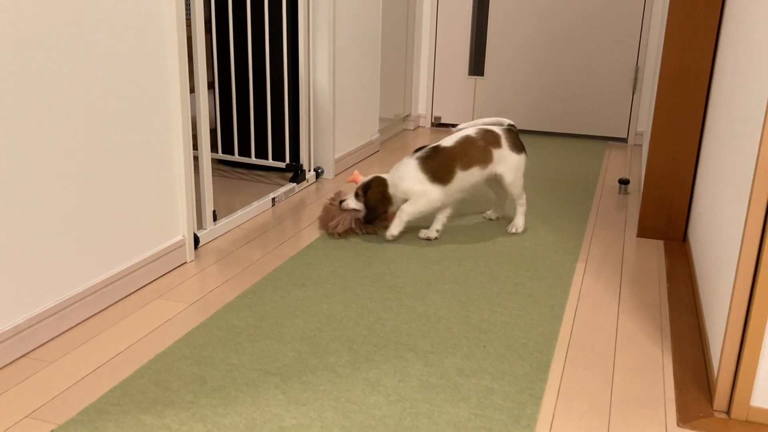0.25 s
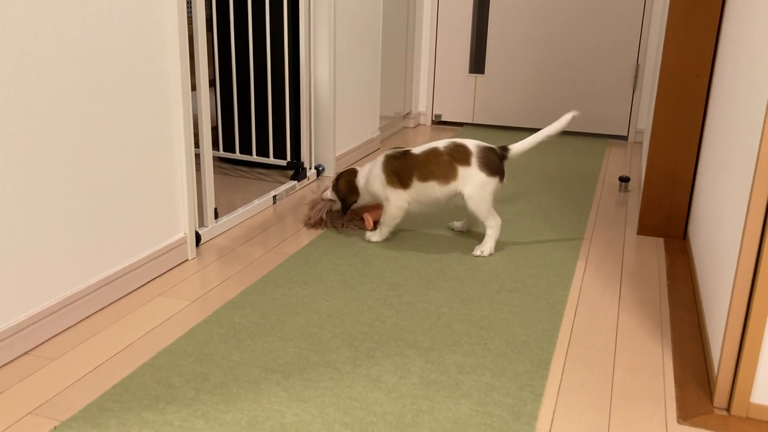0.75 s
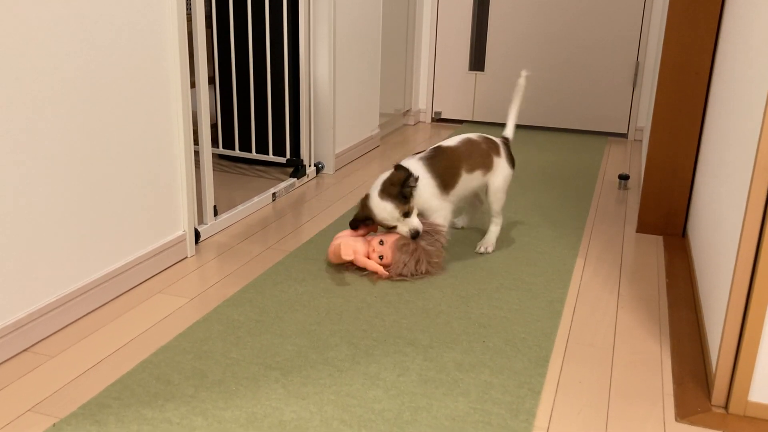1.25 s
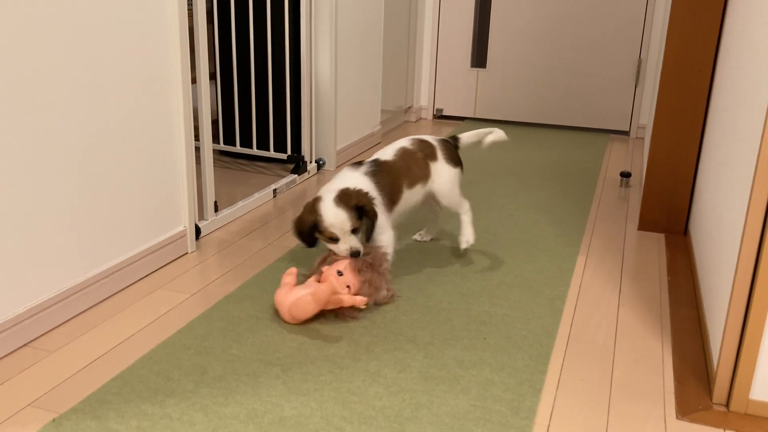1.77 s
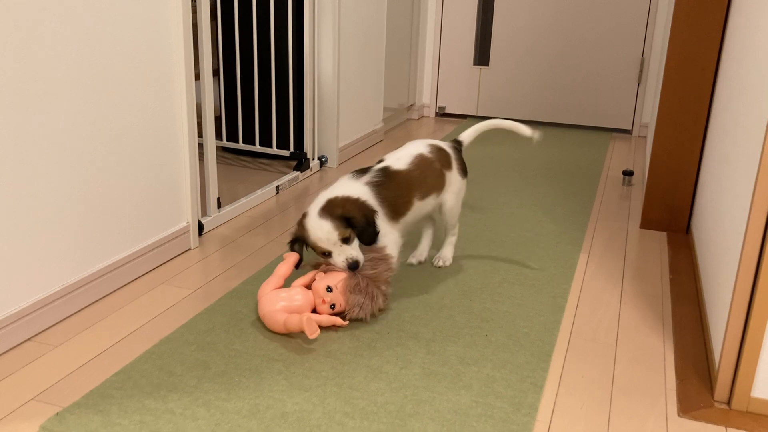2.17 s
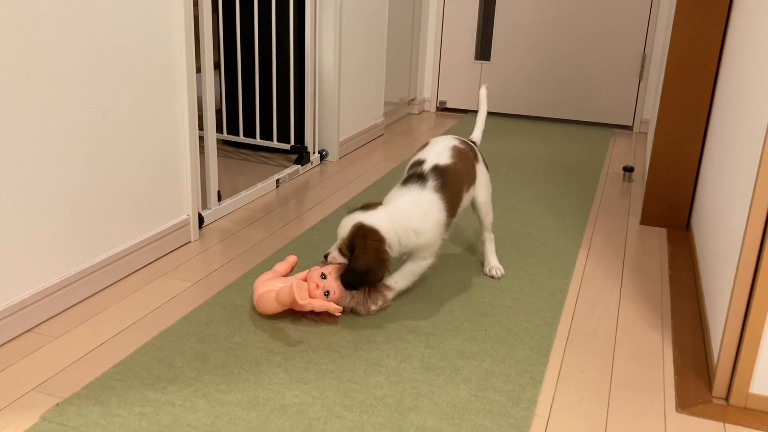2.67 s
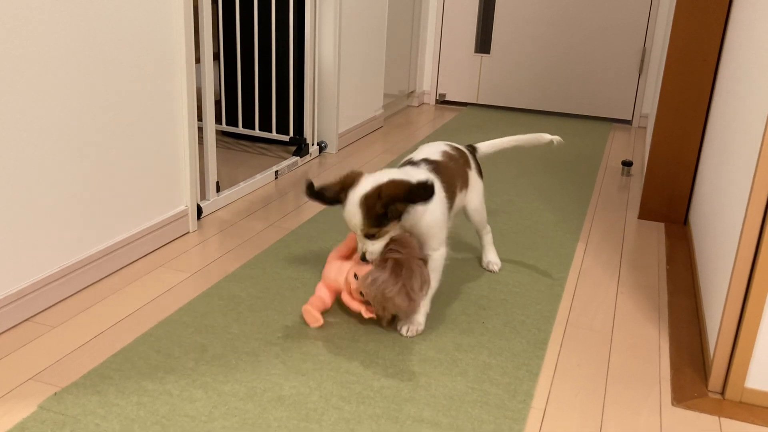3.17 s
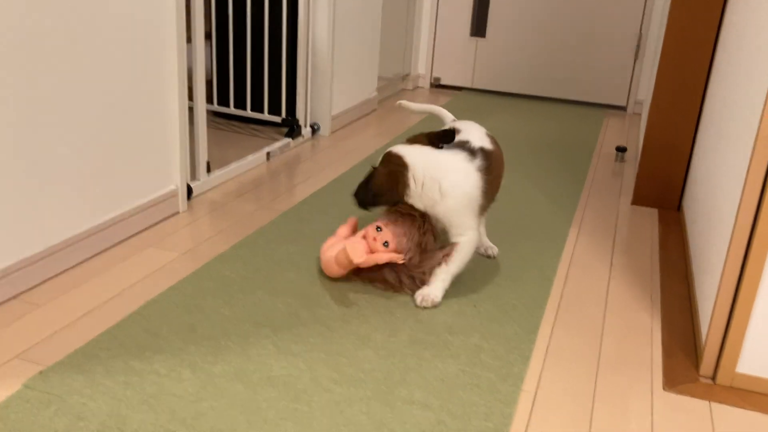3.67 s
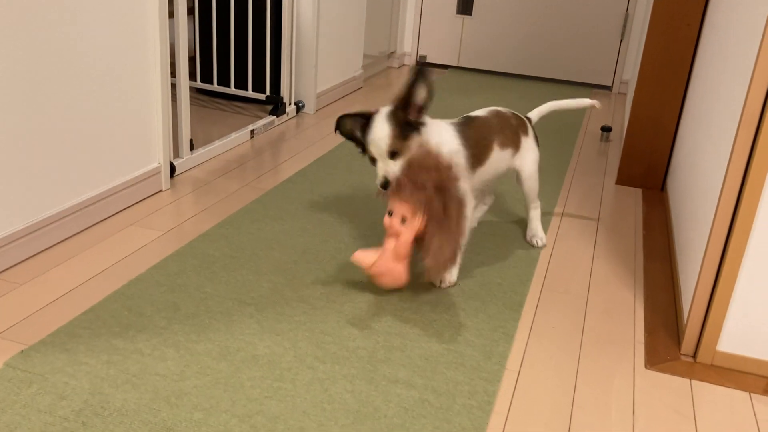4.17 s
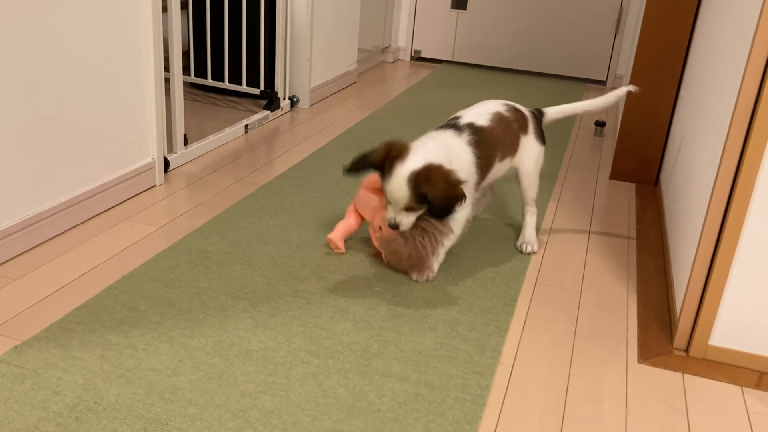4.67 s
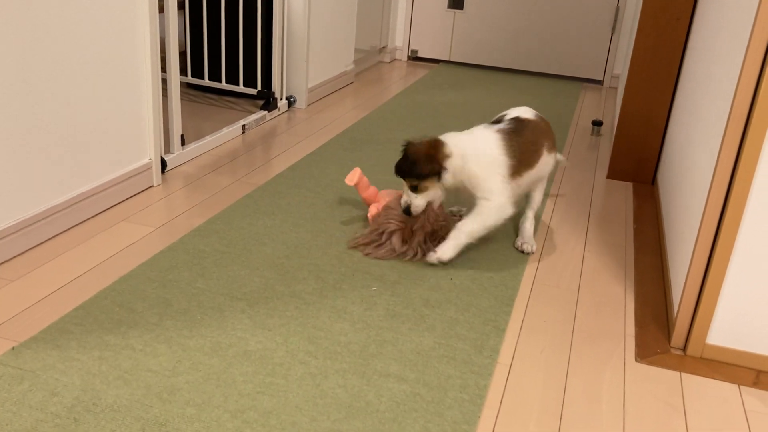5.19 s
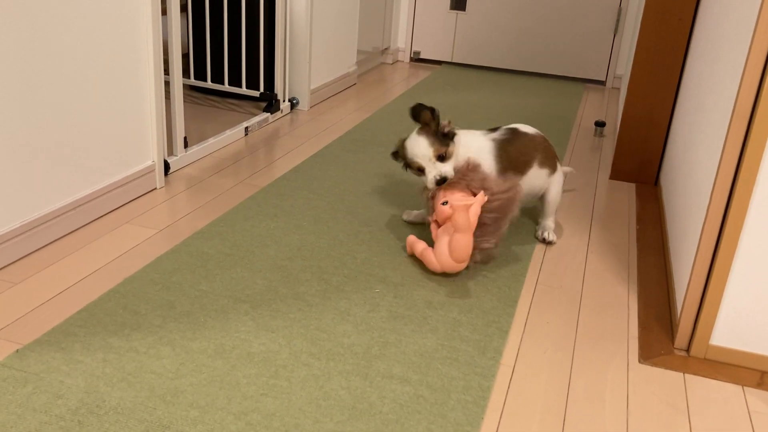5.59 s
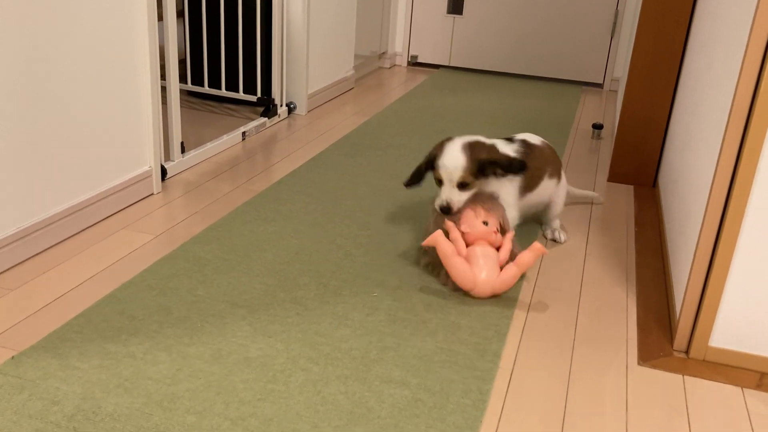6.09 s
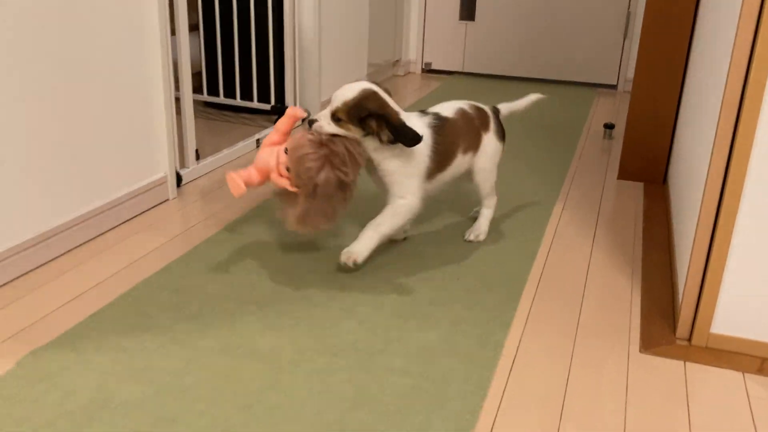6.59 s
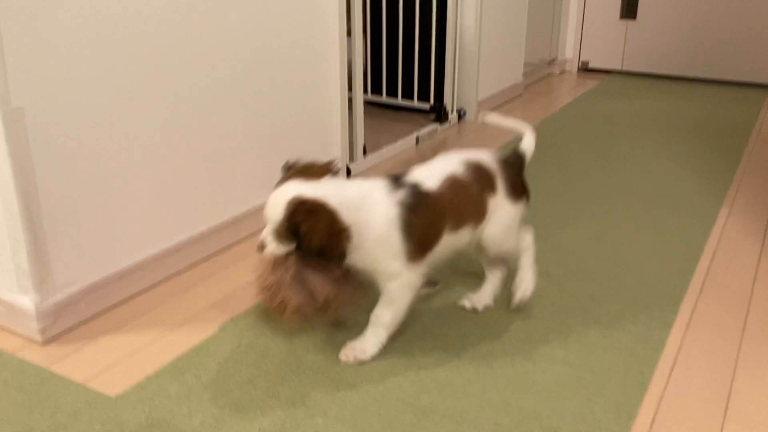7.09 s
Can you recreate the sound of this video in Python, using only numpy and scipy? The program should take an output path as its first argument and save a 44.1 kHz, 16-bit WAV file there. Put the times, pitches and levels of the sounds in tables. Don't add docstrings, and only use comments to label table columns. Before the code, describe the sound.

In a narrow indoor hallway, a small puppy growls in about ten short, rough bursts, muffled round a plastic doll and jerking in pitch as it tugs. Between and across the growls the doll and paws hit the boards with low, dull thumps, some hard, with small plastic and claw ticks. Carpet and fur rustle softly. A small stereo recorder picks it up slightly left, with faint hiss and short room reflections.

```python
import sys
import numpy as np
from scipy import signal
from scipy.fft import rfft, irfft
from scipy.io import wavfile
from scipy.ndimage import uniform_filter1d

SR = 44100
rng = np.random.default_rng(int(sys.argv[2]) if len(sys.argv) > 2 else 0)


def materialize(psi):
    bounded = np.clip(np.atleast_2d(psi).T, -1, 1)
    quanta = np.round(bounded * 32767).astype(np.int16)
    wavfile.write(sys.argv[1], SR, quanta)


def rack_gain(trim_db):
    fader = np.asarray(trim_db, float)
    return 10 ** (fader / 20)


N = 323840

# (start [s], length [s], effort [dB], pitch [Hz], open mouth over throat [dB])
GROWLS = [
    (0.129, 0.42, -52, 129.1, -3),
    (0.885, 0.56, -45.5, 182.5, -15),
    (1.866, 0.41, -49, 142.3, -12.5),
    (2.87, 0.56, -45.5, 167.1, -24.5),
    (3.799, 0.55, -46, 172.2, -18),
    (4.795, 0.15, -55, 185.5, -12),
    (5.057, 0.28, -54, 184.6, -12),
    (5.599, 0.27, -49, 175.4, -15),
    (6.118, 0.13, -43, 154.9, -17),
    (7.031, 0.322, -51.5, 167, -12.5),
]
# (time [s], half length [s], effort change [dB], pitch change [semitones], mouth change [dB])
TUGS = [(0.345, 0.06, 4.5, 1.61, -5), (0.459, 0.06, 11, 4, -7.5), (0.958, 0.049, 3.5, 0, 4.5),
        (1.082, 0.051, 4, 2.04, 9), (1.189, 0.015, -4, 0.4, 3), (1.936, 0.081, 5.5, 1.94, 3),
        (2.281, 0.063, 3, 4.5, -29), (2.91, 0.047, -1, 0.5, 18), (2.988, 0.058, 6, 3, 14),
        (3.116, 0.026, -3.5, -1.1, 5), (3.369, 0.058, 5.5, -0.09, 15), (3.925, 0.046, 5, -1.5, 3),
        (4.04, 0.04, 5.5, 1, 8), (4.177, 0.052, 8, 1.11, 7.5), (4.254, 0.028, 3, -3, 1.5),
        (4.361, 0.054, 11, 0.77, 5.5), (5.081, 0.034, 5.5, -5, -22), (5.208, 0.036, 11.5, 0.5, 2.5),
        (5.276, 0.031, 11.5, 1.06, 5.5), (5.623, 0.053, -2.5, -2.5, 0), (5.792, 0.043, 5, -0.93, 4),
        (7.066, 0.025, 8, -0.02, 7), (7.185, 0.026, 7, 0.4, 0), (7.287, 0.053, -10, 2.25, -16)]
# (centre [Hz], width [Hz], level [dB])
THROAT = [(264, 91.4, 5), (522, 119.6, 3), (617, 104, -2)]
# (centre [Hz], width [Hz], level [dB])
MOUTH = [(980, 350, 4.5), (1627, 850, -1), (1900, 200, 1), (4100, 670, -13.5)]
# (time [s], peak [dB], pitch of the blow [Hz], slap over peak [dB])
THUMPS = [(0.203, -37.5, 143, -15), (0.466, -35, 102, -20.5), (0.564, -23.5, 100.4, -26),
          (1.205, -20.5, 122, -26.5), (1.359, -28, 104, -27), (1.702, -36.5, 89.5, -52),
          (1.819, -11, 126, -21), (2.587, -50, 79, -22), (2.84, -45.5, 78, -37), (3.114, -33, 107, -10.5),
          (3.274, -20.5, 90.6, -42), (3.747, -14.5, 126, -21.5), (4.241, -20.5, 102.7, -31),
          (4.35, -38, 85.5, -22), (4.528, -13.5, 98, -40), (4.757, -16.5, 127.2, -19),
          (4.961, -26, 108, -17.5), (5.332, -46, 84, -14), (5.41, -53, 136, 2), (5.494, -21.5, 102.5, -44),
          (5.648, -34, 100, -15), (5.72, -26.5, 90, -21), (6.358, -46, 136.2, -15),
          (6.419, -42.5, 81.2, -15.5), (6.498, -63, 102, -3), (6.737, -91, 85, -26), (6.82, -51.5, 82, -32),
          (6.945, -16, 96.6, -59), (7.307, -38, 89.1, -43)]
# (pitch [Hz], level [dB], t60 [s])
BOARDS = [(72.4, -3, 0.35), (95.7, -0.5, 0.3), (167, -30.5, 1), (261.5, -29.5, 0.16), (314.5, -40, 0.26)]
# (centre [Hz], width [Hz], level [dB])
UPPER_BOARDS = [(284, 33.3, -3), (320, 88, -0.5), (410, 117, -5), (533, 56, -10)]
# (time [s], peak [dB], centre [Hz], t60 [s])
TICKS = [(1.372, -46, 1580, 0.045), (1.82, -35.5, 1420, 0.065), (4.7578, -35, 850, 0.053),
         (3.7458, -45, 2530, 0.064), (4.2226, -59, 1315, 0.031), (4.2892, -41.5, 1406, 0.042),
         (4.481, -52, 2297, 0.044), (4.5258, -41.5, 1332, 0.056), (4.7554, -32.5, 1261, 0.024),
         (5.4115, -42, 7570, 0.051), (5.4928, -44, 1490, 0.038), (5.7426, -46, 1218, 0.044),
         (6.0343, -50.5, 1723, 0.06), (6.0544, -48, 4196, 0.028), (6.145, -46, 2300, 0.036),
         (6.208, -42.5, 4230, 0.061), (6.2199, -53, 4994, 0.047), (6.9445, -42.5, 3856, 0.033),
         (7.158, -43, 1538, 0.044), (7.1964, -50, 1236, 0.04), (0.912, -51, 1100, 0.029),
         (3.506, -51, 7000, 0.055), (3.897, -51, 1202, 0.025)]
# (time [s], half length [s], hiss [dB], rustle over hiss [dB])
SHUFFLES = [(0.0, 0.31, -57.5, 0), (0.356, 0.098, -59.5, -1), (0.586, 0.14, -59, 0.5),
            (0.915, 0.16, -59, -1.5), (1.22, 0.12, -59, 1.5), (1.505, 0.079, -58, 1),
            (1.826, 0.05, -57.5, -1), (2.025, 0.18, -62.5, -0.5), (2.366, 0.076, -62, -3),
            (2.554, 0.048, -59, -2.5), (2.902, 0.2, -62.5, -1.5), (3.376, 0.14, -63, 2.5),
            (3.533, 0.054, -60, -0.5), (3.657, 0.073, -60.5, -3), (3.897, 0.17, -57.5, -0.5),
            (4.16, 0.03, -70, 9.5), (4.356, 0.087, -63, -3.5), (4.59, 0.091, -61, -2.5),
            (4.772, 0.034, -60, 0.5), (4.942, 0.083, -60.5, 4.5), (5.243, 0.087, -63, 0.5),
            (5.47, 0.094, -61, 0.5), (5.799, 0.073, -61.5, 5.5), (5.982, 0.079, -63.5, 2),
            (6.236, 0.11, -64.5, 4), (6.592, 0.052, -62, -3), (6.855, 0.023, -63, -3),
            (7.078, 0.11, -58, 2.5), (1.68, 0.057, -65.5, 3), (7.3, 0.069, -64, 5)]
# (time [s], level [dB])
PAWS = [(0.72, -55), (1.07, -62), (1.98, -43.5), (2.18, -48), (2.32, -60), (2.93, -45), (3.2, -46.5),
        (3.88, -53), (4.02, -41), (4.35, -45), (5.1, -50), (5.58, -57), (6.148, -60), (7.1, -40),
        (7.17, -42.5)]
# (frequency [Hz], level per Hz [dB])
RUSTLE = [(500, -30), (1000, -3), (2000, -0.5), (4000, -2.5), (6000, -11.5), (8000, 9.5)]
# (frequency [Hz], level per Hz [dB])
RUMBLE = [(40, -9), (60, -11), (85, -0.5), (120, -9.5), (200, -2.5), (320, -32.5)]
# (frequency [Hz], level per Hz [dB])
ROOM_TONE = [(59, -43), (100, -4.5), (161, -15), (232, -13.5), (317, -9.5), (760, -21), (2000, -30.5),
             (2800, -72)]
# (frequency [Hz], level per Hz [dB])
HISS = [(4000, 13), (6500, -25), (8200, 15.5), (11000, 2.5), (15500, 6)]

NEAR_S, NEAR_HALF_S = 7.22, 0.26


def effort():
    attack_s, release_s, edge_db = 0.035, 0.055, 15
    scoop_semitones, scoop_s = 2.2, 0.03
    trot_s, trot_db = 0.0543, 3.5
    t = np.arange(N) / SR
    current = np.maximum(np.searchsorted([g[0] - .03 for g in GROWLS], t) - 1, 0)
    start, length, level_db, pitch, mouth_db = np.transpose(GROWLS)[:, current]
    age = t - start
    since = np.maximum(age, 0)
    before_full = np.clip(1 - age / attack_s, 0, 3.0)
    after_full = np.clip(1 + (age - length) / release_s, 0, 3.5)
    level_db = level_db - edge_db * (before_full + after_full)
    bend = -scoop_semitones * np.exp(-since / scoop_s)
    for s, half, more_db, semitones, open_db in TUGS:
        tug = bump(s, half)
        level_db = level_db + more_db * tug
        bend = bend + semitones * tug
        mouth_db = mouth_db + open_db * tug
    stride = np.cos(2 * np.pi * (t - 7.183) / trot_s)
    level_db = level_db + trot_db * bump(NEAR_S, NEAR_HALF_S) * stride
    jaw_hz = 1148 + 326 * np.exp(-since / 0.18) + 70.6 * drift(7.4)
    return pitch * 2 ** (bend / 12), level_db, mouth_db, jaw_hz


def growl(pitch, throat_db, mouth_db, jaw_hz):
    rough, waver = 0.41, 0.02
    chest = np.exp(-((pitch - 216) / 23.4) ** 2)
    first_db = throat_db + 1 + 10 * chest
    first_db = first_db - 0.17 * (mouth_db + 9.5)
    first_db = first_db + 10 * bump(NEAR_S, NEAR_HALF_S)
    pitch = pitch * (1 + waver * drift(14))
    cycles = np.cumsum(pitch * (1 + .15 * rough * drift(40))) / SR
    cycle = cycles.astype(int)
    alternate_db = 4.7 * np.clip(drift(3.6), 0, 2) * (cycle % 2 - .5)
    each_db = 10 * rough * np.tanh(rng.standard_normal(2000))[cycle % 2000]
    strength = rack_gain(alternate_db + each_db)
    pulses = np.diff(cycle, prepend=0) * strength * np.sqrt(SR / pitch)
    breath = rng.standard_normal(N) * np.exp(-3.5 * (cycles % 1)) * strength
    first = np.sqrt(2) * np.sin(2 * np.pi * np.cumsum(pitch) / SR)
    first = first * rack_gain(8.8 * rough * drift(44))
    source = pulses + 3.0 * rough * breath
    throat = evened(cut(resonances(source, THROAT), [225, 780], "band"))
    rasp = (pulses + 5.5 * rough * breath) / strength ** .6
    mouth = resonances(rasp, MOUTH) + rack_gain(7.0) * moving_resonance(rasp, jaw_hz, width=73)
    mouth = evened(cut(mouth, 860, "high", order=5))
    return rack_gain(first_db) * first + rack_gain(throat_db) * (throat + rack_gain(mouth_db) * mouth)


def thumps():
    push_s = 0.015
    out, t = np.zeros(N + SR), np.arange(SR // 2) / SR
    chance = rng.standard_normal((len(THUMPS), len(BOARDS) * 2))
    for (s, peak_db, blow_hz, slap_db), luck in zip(THUMPS, chance):
        hard = np.clip((blow_hz - 75) / 50, .1, 1.2)
        pitch = 68 + (100 + 115 * hard) * np.exp(-t / .0105)
        rise = t * (.5 + hard) / push_s
        wave = np.sin(2 * np.pi * np.cumsum(pitch) / SR) * rise ** 1.3 * np.exp(-rise ** 1.5)
        wave = wave / np.abs(wave).max()
        for k, (hz, level_db, t60) in enumerate(BOARDS):
            ring_db = level_db - 2.5 - 4.2 * hard + 0.43 * luck[k] - 60 * t / t60
            swell = (1 - np.exp(-(t * hz) ** 2)) * rack_gain(ring_db)
            wave += swell * np.sin(2 * np.pi * hz * (1 + 0.021 * luck[-1 - k]) * t + 3 * luck[k])
        contact = rng.standard_normal(len(t)) * (1 - np.exp(-t / 0.00074)) * rack_gain(-60 * t / 0.11)
        slap = resonances(contact, UPPER_BOARDS) * rack_gain(slap_db + 34)
        out[round(s * SR):][:len(t)] += rack_gain(peak_db - 1.5) * (wave + slap)
    return out[:N]


def ticks():
    out, t = np.zeros(N + SR), np.arange(SR // 5) / SR
    for s, peak_db, hz, t60 in TICKS:
        noise = rng.standard_normal(len(t))
        broad = cut(noise, [900, 7000], "band", order=1)
        edge = 1.46 * broad * rack_gain(-60 * t / 0.013)
        scuff = 0.5 * broad + 3.8 * resonances(noise, [(hz, hz / 3, 0)])
        out[round(s * SR):][:len(t)] += rack_gain(peak_db - 6.5) * (edge + scuff * rack_gain(-60 * t / t60))
    return out[:N]


def hallway(x):
    t60_s, dull_hz = 0.38, 2560
    t = np.arange(SR // 2) / SR
    tail = rng.standard_normal((2, len(t))) * rack_gain(-60 * t / t60_s) * (t > .004)
    tail = cut(cut(tail, dull_hz, "low", order=1), 436, "high")
    return signal.fftconvolve(x[None], rms_one(tail) / np.sqrt(len(t)), axes=1)[:, :N]


def carpet_rubs(throat_db, mouth_db):
    hiss = power(-73)
    rustle = power(-70.5) + power(throat_db + mouth_db - 14)
    for s, half, hiss_db, over_db in SHUFFLES:
        rub = bump(s, half) * power(hiss_db)
        hiss = hiss + rub
        rustle = rustle + rub * power(over_db)
    return 10 * np.log10(rustle), 10 * np.log10(hiss)


def rustle_noise(rustle_db):
    return rack_gain(rustle_db) * coloured(RUSTLE, alike=0.0057, patchy_db=2.5)


def floor_rumble(throat_db):
    after_db, after_share, rise_s, t60_s = -30, 0.52, 0.025, 0.65
    rumble = power(-65.5) + power(throat_db - 13)
    for s, paw_db in PAWS:
        rumble = rumble + bump(s, 0.046) * power(paw_db)
    for s, peak_db, *_ in THUMPS:
        age = np.maximum(np.arange(N) / SR - s, 0)
        fall_db = after_db + after_share * peak_db - 60 * age / t60_s
        rumble = rumble + power(fall_db) * np.minimum(age / rise_s, 1) ** 2
    return np.sqrt(rumble) * coloured(RUMBLE, alike=0.82, patchy_db=0.5)


def room_tone(rustle_db):
    return rack_gain(-60 + 0.34 * (rustle_db + 62)) * coloured(ROOM_TONE, alike=0.59, patchy_db=3.5)


def hiss_noise(hiss_db):
    return rack_gain(hiss_db + 6) * coloured(HISS, alike=0.37, patchy_db=1.77)


def coloured(spectrum, alike, patchy_db):
    hz_at, db_at = np.transpose(spectrum)
    edges = hz_at[0] * 2 ** np.arange(0, np.log2(hz_at[-1] / hz_at[0]) + .5, .5)
    white, out = rng.standard_normal((2, 2, N)), 0
    for k, (low, high) in enumerate(zip(edges, edges[1:])):
        mid, side = cut(white[k % 2], [low, high], "band")
        level_db = np.interp(np.log(low * high) / 2, np.log(hz_at), db_at) + patchy_db * drift(14.6)
        pair = np.sqrt(1 + alike) * mid + np.sqrt(1 - alike) * side * [[1], [-1]]
        out = out + rack_gain(level_db) * pair
    return rms_one(out)


def resonances(x, peaks):
    out = 0
    for k, (hz, width, level_db) in enumerate(peaks):
        r = np.exp(-np.pi * width / SR)
        poles = [1, -2 * r * np.cos(2 * np.pi * hz / SR), r * r]
        ring = signal.lfilter([(1 - r * r) / 2, 0, (r * r - 1) / 2], poles, x)
        out = out + (-1) ** k * rack_gain(level_db) * ring
    return out


def moving_resonance(x, hz, width):
    out, state, r = np.zeros(N), np.zeros(2), np.exp(-np.pi * width / SR)
    zeros = [(1 - r * r) / 2, 0, (r * r - 1) / 2]
    for i in range(0, N, 256):
        poles = [1, -2 * r * np.cos(2 * np.pi * hz[i] / SR), r * r]
        out[i:i + 256], state = signal.lfilter(zeros, poles, x[i:i + 256], zi=state)
    return out


def evened(x):
    return x / np.sqrt(uniform_filter1d(x ** 2, size=2600) + 1e-12)


def cut(x, hz, kind, order=2):
    return signal.sosfilt(signal.butter(order, hz, kind, fs=SR, output="sos"), x)


def drift(rate):
    r = np.exp(-2 * np.pi * rate / SR)
    return rms_one(signal.lfilter([1], [1, -2 * r, r * r], rng.standard_normal(N + SR))[SR:])


def bump(s, half):
    return np.exp(-((np.arange(N) / SR - s) / half) ** 2)


def rms_one(x):
    return x / np.sqrt(np.mean(x ** 2) + 1e-20)


def power(level_db):
    return rack_gain(level_db) ** 2


def scene():
    pitch, throat_db, mouth_db, jaw_hz = effort()
    voice, floor, hard = growl(pitch, throat_db, mouth_db, jaw_hz), thumps(), ticks()
    near = voice + cut(floor + hard, [640, 800], "bandstop", order=1)
    bright = cut(near, 640, "high")
    direct = near * rack_gain(np.array([[.8], [-.8]])) + 0.29 * bright * np.array([[1], [-1]])
    direct[1] = np.roll(direct[1], shift=3)
    sent = rack_gain(-9) * voice + rack_gain(-22) * floor + rack_gain(-12) * hard
    room = hallway(sent) * rack_gain(np.array([[1.2], [-1.2]]))
    rustle_db, hiss_db = carpet_rubs(throat_db, mouth_db)
    air = rustle_noise(rustle_db) + floor_rumble(throat_db) + room_tone(rustle_db) + hiss_noise(hiss_db)
    return direct + room + air


def roll_off(x):
    return signal.sosfilt(signal.butter(12, 17100, fs=SR, output="sos"), x)


def record(dry):
    shared_from_hz, in_step_hz, lag_samples, top_hz = 5000, 6940, 10, 15760
    hz = np.arange(N // 2 + 1) * SR / N
    both = rfft(cut(dry, 52, "high", order=3), axis=1)
    shared = np.clip((hz - shared_from_hz) / 3300, 0, 1)
    turn = np.pi * (hz - in_step_hz) * lag_samples / SR
    one = both.mean(axis=0) * np.exp(1j * turn * [[-1], [1]])
    mix = irfft((1 - shared) * both + shared * one * (hz < top_hz), N, axis=1)
    return roll_off(mix)


dry = scene()
out = record(dry)
materialize(out)
```